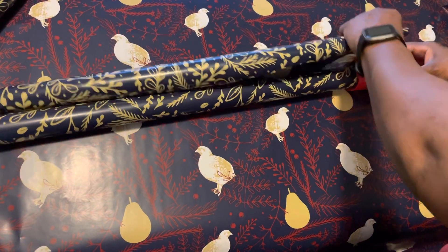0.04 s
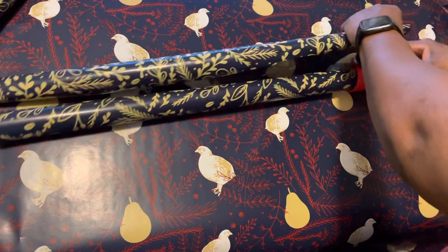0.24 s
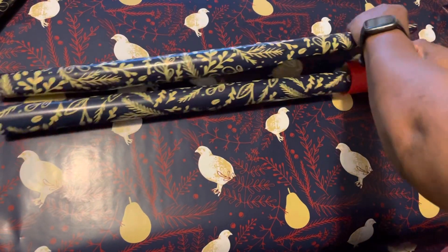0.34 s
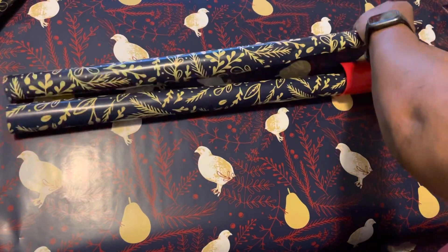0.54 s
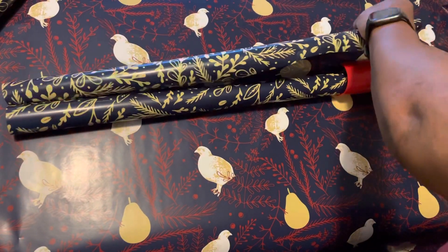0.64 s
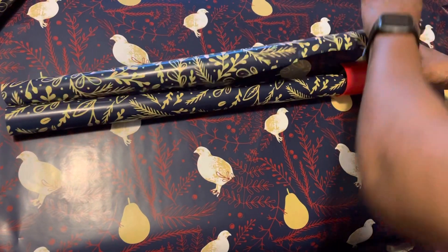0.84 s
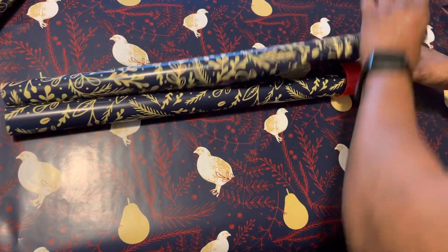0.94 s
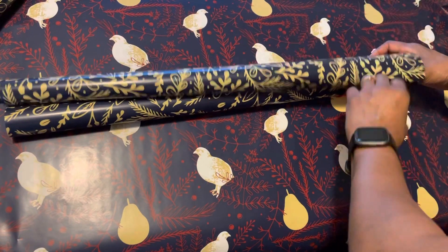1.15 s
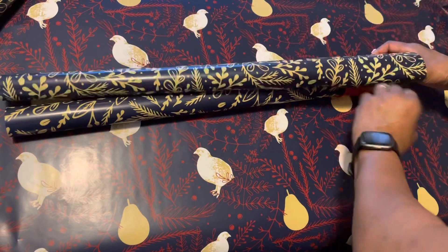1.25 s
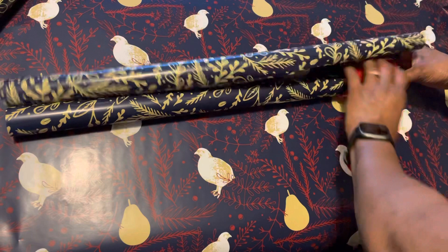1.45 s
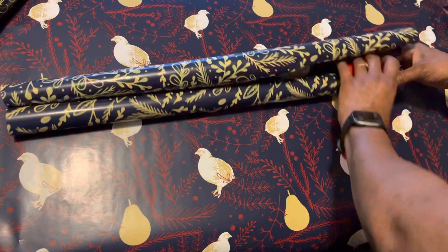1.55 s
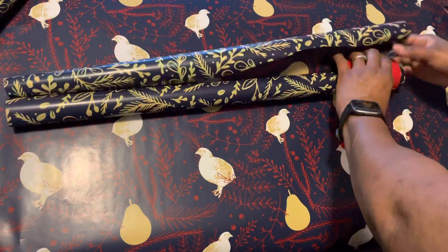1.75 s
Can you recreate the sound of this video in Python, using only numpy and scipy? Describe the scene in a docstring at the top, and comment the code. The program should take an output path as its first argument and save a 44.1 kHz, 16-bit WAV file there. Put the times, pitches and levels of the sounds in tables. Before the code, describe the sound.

Wrapping paper rolls are handled on a table: soft rubbing, then a short rough plastic scrape with a high squeak, followed by light knocks and a sharp clack, close to a phone in a quiet room.

```python
"""Two rolls of wrapping paper and a plastic cutter are handled on a table, close to a phone in a quiet room.
Paper rubs and crinkles from the start, built from coarse and fine random grains over a low rumble.
From 0.2 s the cutter scrapes once along a roll: dense slips through sliding resonances, with a high squeak.
From about 0.23 s knocks ring plastic modes, thump the tube and crack, sharpest near 1.33 s, lighter at the end.
A short room echo follows every sound; room air and microphone hiss lie beneath throughout."""
import sys
import numpy as np
from scipy import signal
from scipy.fft import rfft, irfft, next_fast_len
from scipy.io import wavfile
from scipy.ndimage import uniform_filter1d, map_coordinates

SR = 44100
rng = np.random.default_rng(int(sys.argv[2]) if len(sys.argv) > 2 else 0)


def transcribe(signal):
    """Save signal, clipped to [-1, 1], as a 16-bit WAV file at the path in sys.argv[1]."""
    frames = np.atleast_2d(signal).T
    limited = np.clip(frames, -1, 1)
    pcm = np.round(limited * 32767).astype(np.int16)
    wavfile.write(sys.argv[1], SR, pcm)


N = 79380

# Knocks: start_s, level_db, centre_hz, thump_db (re THUMP_DB), crack_db (re CRACK_DB)
KNOCK_EVENTS = [(0.231, -34, 950, -30, -32), (0.249, -24.5, 1510, -11, -23), (0.435, -29, 1560, -7, -36),
                (0.552, -30.5, 2670, -27, -14), (0.549, -31.5, 1140, -4, -14),
                (0.567, -39.5, 790, 4.5, -22), (0.591, -44, 1170, -31, -23),
                (0.602, -33.5, 2530, -42, -4.5), (0.625, -41.5, 912, -10, -4), (0.644, -40, 1910, -18, -28),
                (0.723, -37, 2620, -41, -5.5), (0.723, -43.5, 1010, -41, -33), (0.944, -39.5, 990, -7, -22),
                (0.958, -36, 2460, -13.5, -32), (0.963, -31, 900, -15, -43), (0.97, -37, 900, -15, -32),
                (0.992, -39, 1690, -32, -25), (1.002, -31, 2470, -15, -23), (1.004, -32, 910, -18, -40),
                (1.011, -38, 970, -24, -41), (1.018, -47, 1500, -30, -30), (1.023, -40, 1170, -5.5, -32),
                (1.038, -40, 1510, -15, -28), (1.053, -38, 910, -33, -38), (1.102, -45, 907, -6, -5),
                (1.289, -41, 990, -26, -8.5), (1.332, -21.5, 1760, -27, 0.5),
                (1.333, -23.5, 3650, -31, -19), (1.335, -22.5, 1200, -20.5, -29),
                (1.344, -38.5, 3400, -43, -17), (1.348, -37, 1300, -20, -13),
                (1.361, -22, 1850, -23.5, -12), (1.365, -34, 1300, -17, -30), (1.373, -35, 1490, -25, -25),
                (1.383, -32, 1330, -20, -28), (1.435, -29.5, 1190, -13.5, -33),
                (1.448, -33, 1290, -15, -28), (1.451, -27, 1450, -12.5, -27), (1.499, -27, 2080, -39, -12),
                (1.502, -36.5, 1500, -19, -3), (1.508, -50, 2400, -30, -22),
                (1.648, -43.5, 1600, -11.5, -8), (1.744, -41.5, 2210, -17, -5),
                (1.769, -45.5, 930, -3.5, -1)]
# Ringing modes of the plastic: pitch_hz, level_db, t60_s
PLASTIC_MODES = [(670, -10, 0.022), (1008, 0, 0.024), (1369, 3.5, 0.017), (1950, 6, 0.011),
                 (2320, -0.5, 0.0092), (2586, -6.5, 0.017), (3140, -7.5, 0.0048), (3790, 2.5, 0.012),
                 (4200, -3, 0.0094)]
# Ringing modes of the cardboard-like low thump of the tube: pitch_hz, level_db, t60_s
TUBE_MODES = [(119, -20, 0.1), (214.5, -10.5, 0.099), (350, 2, 0.055), (433, -7, 0.053)]
# Course of the cutter scrape: time_s, level_db, squeak_db (re SQUEAK_DB)
SCRAPE_COURSE = [(0.2, -31, -6), (0.214, -36, -7), (0.222, -34.5, 3), (0.228, -40.5, -7), (0.24, -33, 0.5),
                 (0.262, -35.5, -2), (0.276, -34.5, 5), (0.305, -38, -3), (0.334, -34.5, 2),
                 (0.348, -37.5, 2), (0.358, -36, 8), (0.37, -39.5, 4.5), (0.397, -38, 0.5),
                 (0.42, -46.5, 1), (0.47, -70, 2)]
# Tone colour of the scraping slips: pitch_hz, gain_db
SCRAPE_TONE = [(60, -15), (130, 1.5), (300, -2.5), (1000, -5), (2000, 0), (4500, -8.5), (7000, -8),
               (11000, -7.5), (14000, -3.5), (16500, -24)]
# Resonances that the scrape excites: pitch_hz, width_hz, level_db
SCRAPE_RESONANCES = [(344, 82, 4), (965, 76, 7.5), (1290, 150, -2), (1896, 90, 4.5), (2614, 200, 4.5),
                     (3250, 120, -6), (3910, 200, 4.5), (4600, 380, 4), (7130, 250, 14), (11600, 880, 6)]
# Course of the paper rubbing: time_s, body_db, treble_db, rumble_db
RUSTLE_COURSE = [(0, -48.5, -53.5, -53.5), (.03, -51, -60, -51), (.09, -66.5, -71, -68.5),
                 (.14, -56.5, -57.5, -57.5), (.195, -49.5, -58, -62), (.23, -52, -36, -73),
                 (.3, -55, -44, -60), (.41, -51, -65, -58), (.47, -59.5, -65, -64), (.52, -62.5, -69, -64),
                 (.56, -53.5, -55.5, -50), (.64, -56, -62, -54.5), (.7, -67.5, -73.5, -71),
                 (.76, -70, -63, -91), (.89, -67, -68, -75), (.935, -67, -63.5, -81),
                 (.96, -49, -57.5, -57), (1.04, -49, -61.5, -61), (1.09, -62.5, -76.5, -70),
                 (1.12, -53.5, -59.5, -57.5), (1.2, -59.5, -64, -66), (1.24, -67.5, -77, -82),
                 (1.28, -66, -78, -67), (1.3, -55.5, -58, -57), (1.38, -51, -49, -54),
                 (1.42, -50, -58.5, -52.5), (1.5, -51, -54, -63), (1.56, -55.5, -64, -50.5),
                 (1.6, -60.5, -66.5, -58), (1.65, -56.5, -61, -56.5), (1.7, -61.5, -60.5, -69),
                 (1.8, -53, -60.5, -67)]
# Tone colours of the three paper layers: pitch_hz, gain_db
BODY_TONE = [(200, -5.5), (400, -2.5), (700, 0.5), (1100, 2), (1500, -1), (2200, -5.5), (3200, -11.5),
             (5000, -53)]
TREBLE_TONE = [(1500, -50), (3000, 16.5), (5000, 15.5), (7000, 23.5), (8500, -8), (10500, 21.5),
               (13000, 15), (16000, -28)]
RUMBLE_TONE = [(40, -15), (70, 2), (120, 0.5), (200, 0), (350, -3), (600, -28)]
# Tone colour of the room echo: pitch_hz, gain_db
ECHO_TONE = [(250, -19.5), (700, -7), (1500, -5), (4000, 0.5), (7000, -6.5), (10500, 6.5), (14000, -9)]
# Tone colour of room air and hiss: pitch_hz, gain_db
HUM_TONE = [(25, -86), (45, 12), (65, 12.5), (120, 9), (250, -7), (600, -42), (1100, -2), (3000, -3.5),
            (8000, -32), (16000, -17.5)]

# Knocks
RISE_S, CHATTER_S = .0006, 0.0012
MODE_SCATTER_DB, FOCUS_DB_PER_OCTAVE = 3, 14.5
PAPER_DB, PAPER_S = -10.5, 0.0048
THUMP_DB, THUMP_S = 4, 0.00033
CRACK_DB, CRACK_S, CRACK_HZ, CRACK_TOP_HZ = 12.5, 0.0009, 2860, 12300
THIN_HZ = 650  # plastic and paper radiate little below this
TRAIL_S, ON_TIME_HZ = .0036, 3500  # travel time at 1 kHz; pitch that arrives at the listed time
# Scrape
SLIPS_PER_S, SLIP_SPREAD_DB = 3500, 3.5
SCRAPE_START_S, SCRAPE_RISE_S = 0.2, 0.011
SQUEAK_HZ, SQUEAK_WIDTH_HZ, SQUEAK_DB = 6170, 155, -6.5
# Paper
BODY_GRAINS_PER_S, BODY_SPREAD_DB = 900, 2.5
TREBLE_GRAINS_PER_S, TREBLE_SPREAD_DB = 2600, 0.5
GRAIN_TOP_DB = 5  # cap on any grain or slip
# Room and phone
ECHO_T60_S, ECHO_TREBLE_T60_S, ECHO_SPLIT_HZ = 0.13, 0.043, 3940
HUM_DB = -65
LEFT_LAG_S, LEFT_DB = .000042, -2
LOW_CUT_HZ, TOP_HZ = 34.6, 16300


def undb(db):
    """Decibels to amplitude."""
    return 10 ** (np.asarray(db) / 20)


def unit(x):
    """Scale to an RMS of one."""
    return x / np.sqrt(np.mean(x ** 2))


def band_filter(x, order, hz, kind):
    """Butterworth filter."""
    return signal.sosfilt(signal.butter(order, hz, kind, fs=SR, output="sos"), x)


def curve(rows, axis):
    """Gain over time from a dB column."""
    rows = np.array(rows)
    return undb(np.interp(np.arange(N) / SR, rows[:, 0], rows[:, axis]))


def colour(x, points):
    """Minimum-phase filter through (pitch_hz, gain_db) points, so no sound precedes its cause."""
    hz, db = np.array(points).T
    size = 8192
    bin_hz = np.arange(size // 2 + 1) * SR / size
    log_gain = np.interp(np.log(bin_hz + 1), np.log(hz), db) * np.log(10) / 20
    cepstrum = irfft(log_gain)
    # folding the cepstrum forward makes the filter causal
    cepstrum[1:size // 2] *= 2
    cepstrum[size // 2 + 1:] = 0
    impulse = irfft(np.exp(rfft(cepstrum)))[:size // 2]
    return signal.fftconvolve(x, impulse)[:len(x)]


def grains(per_s, spread_db):
    """Random tiny slips of either sign and uneven size."""
    chance, sign, size = rng.random((3, N))
    size_db = np.minimum(-spread_db * np.log(1 - size), GRAIN_TOP_DB)
    return (chance < per_s / SR) * np.sign(sign - .5) * undb(size_db)


def random_steps(k):
    """Random values, each held for k samples."""
    return np.repeat(rng.standard_normal(N // k + 1), k)


def flicker(per_s, depth_db):
    """Uneven contact: a quick random gain."""
    k = int(SR / per_s)
    return undb(depth_db * uniform_filter1d(random_steps(k), k)[:N])


def drift(x, per_s, depth_s):
    """Read at a wandering place, so that pitch slides a little."""
    k = int(SR / per_s)
    wander = uniform_filter1d(uniform_filter1d(random_steps(k), k), k)[:N]
    return map_coordinates(x, [np.arange(N) + depth_s * SR * wander], mode="mirror")


def phase_shift(x, size, turns_at):
    """Delay each pitch by its own number of turns."""
    hz = np.arange(size // 2 + 1) * SR / size
    return irfft(rfft(x, size) * np.exp(-2j * np.pi * turns_at(hz)), size)[:len(x)]


def bend(x):
    """Bending waves along the roll: the treble arrives first, the bass trails."""
    def turns_at(hz):
        return TRAIL_S * (2 * np.sqrt(1000 * hz) - hz * np.sqrt(1000 / ON_TIME_HZ))
    return phase_shift(x, next_fast_len(len(x)), turns_at)


def ring(push, modes, extra_db):
    """A push sets off decaying modes, scaled to a peak of one."""
    t = np.arange(SR // 5) / SR
    bell = np.zeros(len(t))
    for (hz, db, t60), extra in zip(modes, extra_db):
        bell += undb(db + extra) * np.sin(2 * np.pi * hz * t) * 1000. ** (-t / t60)
    out = signal.fftconvolve(push, bell)[:len(t)]
    return out / np.abs(out).max()


def knock(hz, thump_db, crack_db):
    """Brief chatter rings the plastic near its centre pitch, with a papery burst, tube thump and bright crack."""
    t = np.arange(SR // 5) / SR
    rise = 1 - np.exp(-(t / RISE_S) ** 2)
    chatter, crack, paper = rng.standard_normal((3, len(t))) * rise
    plastic_scatter = MODE_SCATTER_DB * rng.standard_normal(len(PLASTIC_MODES))
    tube_scatter = MODE_SCATTER_DB * rng.standard_normal(len(TUBE_MODES))
    # modes far from the centre pitch ring less
    focus = -FOCUS_DB_PER_OCTAVE * np.abs(np.log2(np.array(PLASTIC_MODES)[:, 0] / hz))
    plastic = ring(chatter * np.exp(-t / CHATTER_S), PLASTIC_MODES, focus + plastic_scatter)
    burst = unit(band_filter(paper, 2, [hz / 1.52, hz * 1.6], "band")) * np.exp(-t / PAPER_S)
    upper = band_filter(plastic + undb(PAPER_DB) * burst, 3, THIN_HZ, "high")
    thump = ring(t * np.exp(-t / THUMP_S), TUBE_MODES, tube_scatter)
    crack = band_filter(crack * np.exp(-t / CRACK_S), 2, [CRACK_HZ, CRACK_TOP_HZ], "band")
    return upper + undb(THUMP_DB + thump_db) * thump + undb(CRACK_DB + crack_db) * crack


def knocks():
    """All knocks at their times, spread by the bending waves of the roll."""
    out = np.zeros(N + SR)
    for start_s, level_db, hz, thump_db, crack_db in KNOCK_EVENTS:
        sound = knock(hz, thump_db, crack_db)
        i = int((start_s - RISE_S) * SR)
        out[i:i + len(sound)] += undb(level_db) * sound
    return bend(out)[:N]


def scrape():
    """Dense slips of the cutter on the roll; each resonance comes, goes and slides; the blade squeaks high."""
    slips = colour(grains(SLIPS_PER_S, SLIP_SPREAD_DB), SCRAPE_TONE)

    def resonance(hz, width_hz):
        b, a = signal.iirpeak(hz, hz / width_hz, fs=SR)
        return drift(signal.lfilter(b, a, slips), per_s=15, depth_s=0.001005)

    rings = np.zeros(N)
    for hz, width_hz, db in SCRAPE_RESONANCES:
        rings += undb(db) * flicker(60.1, depth_db=2.6) * resonance(hz, width_hz)
    squeak = undb(SQUEAK_DB) * unit(resonance(SQUEAK_HZ, SQUEAK_WIDTH_HZ)) * curve(SCRAPE_COURSE, axis=2)
    rough = unit(slips + rings) * flicker(89.1, depth_db=2.3)
    t = np.arange(N) / SR
    gate = np.clip((t - SCRAPE_START_S) / SCRAPE_RISE_S, 0, 1) * (t < SCRAPE_COURSE[-1][0])
    return (rough + squeak) * curve(SCRAPE_COURSE, axis=1) * gate


def rustle():
    """Paper on paper: coarse grains in the body, fine ones in the treble, the rolls rumbling on the table."""
    contact = flicker(43.92, depth_db=1.0)
    body = unit(colour(grains(BODY_GRAINS_PER_S, BODY_SPREAD_DB), BODY_TONE))
    treble = unit(colour(grains(TREBLE_GRAINS_PER_S, TREBLE_SPREAD_DB), TREBLE_TONE))
    rumble = unit(colour(grains(1200, spread_db=1.7), RUMBLE_TONE))
    paper = body * curve(RUSTLE_COURSE, axis=1) + treble * curve(RUSTLE_COURSE, axis=2)
    return contact * paper + rumble * curve(RUSTLE_COURSE, axis=3)


def room_echo(near):
    """Two independent noise tails, one per channel; the treble dies sooner than the rest."""
    t = np.arange(SR // 4) / SR
    noise = rng.standard_normal((2, len(t)))
    dull = band_filter(noise, 2, ECHO_SPLIT_HZ, "low")
    tails = dull * 1000. ** (-t / ECHO_T60_S) + (noise - dull) * 1000. ** (-t / ECHO_TREBLE_T60_S)
    wet = colour(near, ECHO_TONE)
    return np.array([signal.fftconvolve(wet, tail / np.sqrt(np.sum(tail ** 2)))[:N] for tail in tails])


def hum():
    """Room air and microphone hiss; the bass is shared by both ports."""
    mid = colour(rng.standard_normal(N), HUM_TONE)
    side = band_filter(colour(rng.standard_normal(N), HUM_TONE), 1, 500, "high")
    return undb(HUM_DB) * unit(mid + side * np.array([[1], [-1]]))


def scene():
    """Close sounds reach the left port slightly later and softer; echo and hum join them."""
    near = knocks() + scrape() + rustle()
    late = phase_shift(near, next_fast_len(N + 64), lambda hz: hz * LEFT_LAG_S)
    return np.array([undb(LEFT_DB) * late, near]) + room_echo(near) + hum()


def record(dry):
    """The phone thins the deep bass and cuts the top."""
    thin = band_filter(dry, 3, LOW_CUT_HZ, "high")
    return signal.sosfilt(signal.ellip(10, .2, 80, TOP_HZ, fs=SR, output="sos"), thin)


dry = scene()
out = record(dry)
transcribe(out)
```